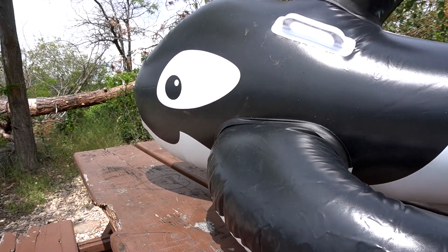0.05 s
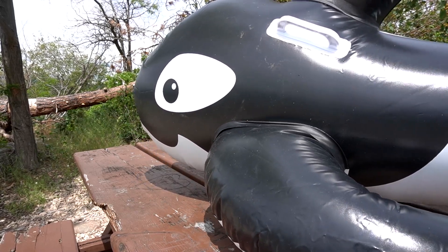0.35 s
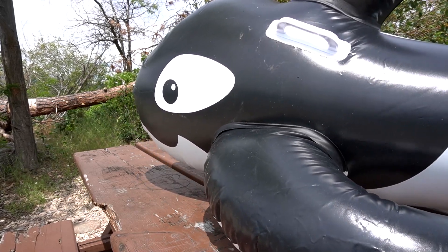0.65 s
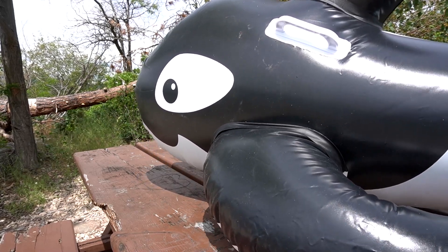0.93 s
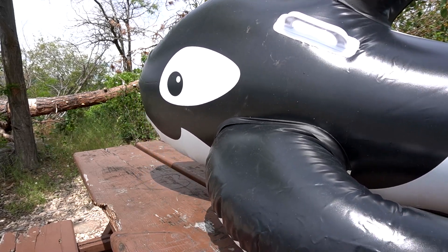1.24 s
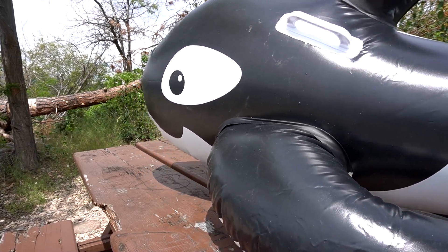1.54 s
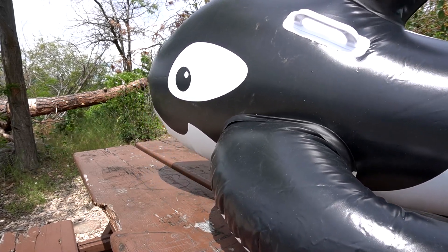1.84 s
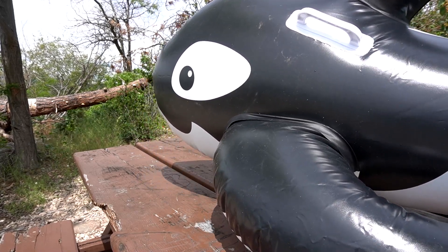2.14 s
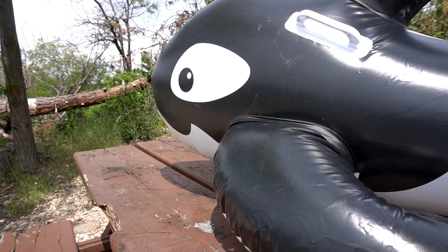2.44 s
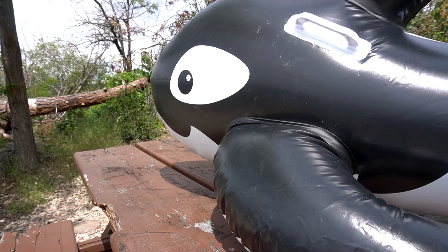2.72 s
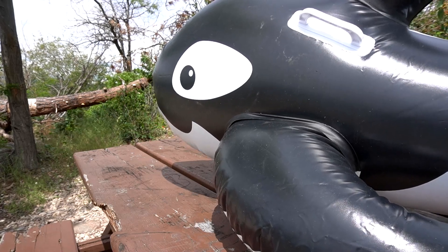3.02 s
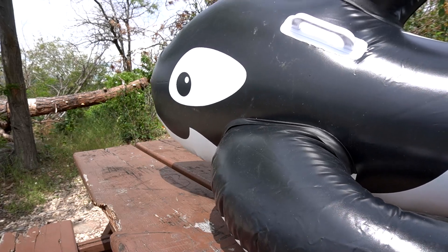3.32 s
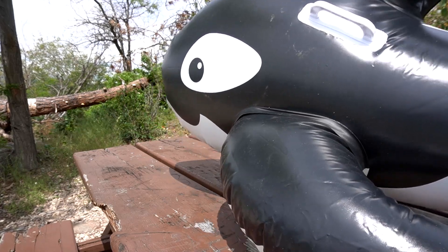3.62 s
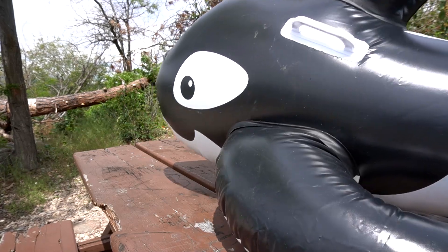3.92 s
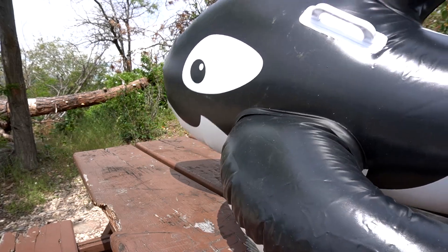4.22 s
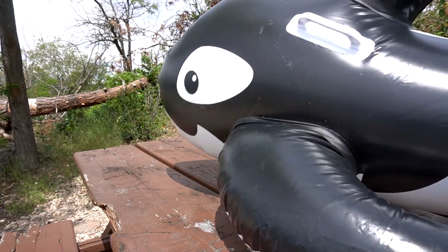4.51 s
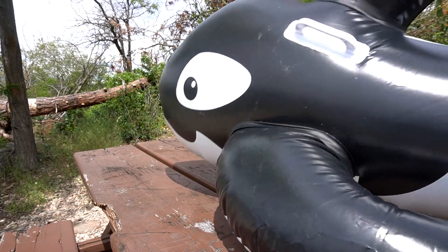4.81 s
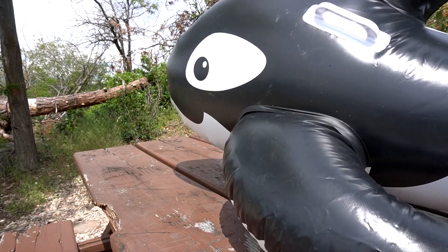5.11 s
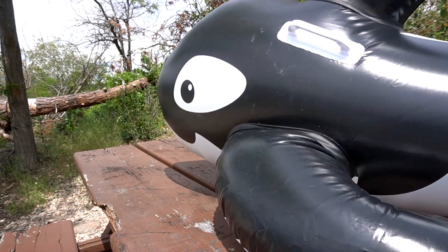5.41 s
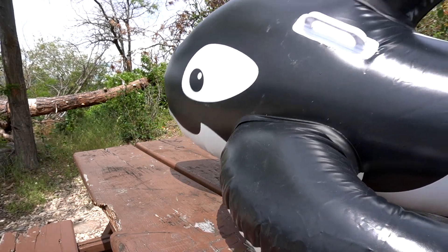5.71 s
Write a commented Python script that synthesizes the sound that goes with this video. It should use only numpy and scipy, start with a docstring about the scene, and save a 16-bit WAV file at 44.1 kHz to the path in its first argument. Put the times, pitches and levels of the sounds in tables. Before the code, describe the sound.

A faint low outdoor rumble and the drone of a distant engine run throughout. After a faint pop and a small click, a hand pump starts at about 0.8 seconds, close and slightly to the right, filling a large vinyl toy. It runs at two cycles a second: a soft low valve pop, a hollow hiss on the pull, then a brighter, louder jet of air on the push. The strongest strokes come between 1.5 and 2.2 seconds, with light clacks and tiny chirps. The stretching vinyl ticks faintly. At 3 seconds the seal gives a very short squeak, followed by a sharp clack at 3.2 seconds. At 3.7 seconds the pump rests and air seeps quietly through the hose for half a second. From about 4.3 seconds four more hissing cycles follow, continuing to the end at 6 seconds.

```python
"""A double-action hand pump fills a large vinyl toy outdoors, over the drone of a distant engine.
After a faint pop and a clack, pumping starts near 0.8 s, two cycles a second: a valve flap pops as the
piston turns, the pull draws a soft, hollow hiss, the push drives a bright jet through the nozzle, and
the stretching vinyl ticks. Now and then shaft and valve clack and the seal chirps, loudest around 3 s.
At 3.7 s the piston rests and air seeps through the hose for half a second; four more cycles follow."""
import sys
import numpy as np
from scipy import signal
from scipy.fft import rfft, irfft
from scipy.io import wavfile
from scipy.ndimage import uniform_filter1d

SR = 44100
rng = np.random.default_rng(int(sys.argv[2]) if len(sys.argv) > 2 else 0)


def output_pcm(signal):
    """Save a mono or channel-first signal as 16-bit PCM at the path in sys.argv[1].

    Samples are clipped to [-1, 1] before scaling.
    """
    pcm = np.clip(np.atleast_2d(signal).T, -1, 1) * 32767
    wavfile.write(sys.argv[1], SR, np.round(pcm).astype(np.int16))


N = 262395
TIME, FREQ_HZ = np.arange(N) / SR, np.fft.rfftfreq(N, 1 / SR)
HOP = 128
FRAME_S = np.arange(N // HOP + 5)[:, None] * HOP / SR
BIN_HZ = np.fft.rfftfreq(4 * HOP, 1 / SR)
GRID = (len(FRAME_S), len(BIN_HZ))
LOW_BAND = 1 / (1 + (BIN_HZ / 4200) ** 3)  # weight of the lower part of the hiss


def amp(db):
    """Amplitude ratio of a level in decibels."""
    return 10 ** (np.asarray(db) / 20)


def unit(x):
    """Normalisation to rms 1."""
    return x / np.sqrt(np.mean(x ** 2) + 1e-20)


def read(table, hz, axis=1):
    """Linear interpolation of one table column over log frequency."""
    table = np.array(table)
    return np.interp(np.log(hz + 1), np.log(table[:, 0]), table[:, axis])


def add(mix, s, sound):
    """Superposition of a sound on the mix at time s."""
    part = mix[max(round(s * SR), 0):][:len(sound)]
    part += sound[:len(part)]


def wander(rate_hz):
    """Low-pass random fluctuation of rms 1."""
    return unit(irfft(rfft(rng.standard_normal(N)) * np.exp(-(FREQ_HZ / rate_hz) ** 2), N))


def patches(frames, bins):
    """Random field of rms 1, correlated over time and frequency."""
    field = rng.standard_normal(GRID)
    for _ in range(2):
        field = uniform_filter1d(uniform_filter1d(field, frames, axis=0), bins, axis=1)
    return unit(field)


def noise(gain):
    """Spectral shaping of white noise by a frames x bins gain; unit gain gives rms 1."""
    white = rng.standard_normal(GRID) + 1j * rng.standard_normal(GRID)
    spectra = np.array([white.T, (white * gain).T])
    plain, shaped = signal.istft(spectra, nperseg=4 * HOP, noverlap=3 * HOP)[1][:, :N]
    return shaped / plain.std()


def scatter(x, t60):
    """Early reflections from table, toy and ground: one spectrally flat set for each side."""
    t = np.arange(SR // 20) / SR
    response = rfft(rng.standard_normal((2, len(t))) * amp(-60 * t / t60), axis=1)
    response /= np.sqrt(uniform_filter1d(abs(response) ** 2, size=25, axis=1))
    taps = irfft(response, len(t))[:, :len(t) // 2]
    return signal.oaconvolve(x[None], taps, axes=1)[:, :N]


# Sound field of the pump: f/Hz, left-minus-right level/dB, direct share of the power
PUMP_FIELD = [(150, -2, .99), (476, -2.5, 0.91), (1040, -6.5, 0.42), (2200, -7.5, 0.28),
              (4040, -11.5, 0.27), (6000, -6, 0.54), (7800, -3.5, 0.51), (9800, -2.5, 0.87),
              (13200, -5, 0.7), (15700, -8.5, 0.77)]
# Phase lag of the left side: f/Hz, phase/rad
LEFT_LAG = [(400, 0), (1100, .6), (2200, 2.5), (4000, 2.9), (6000, 3.1), (8000, 4), (10000, 5),
            (13000, 6.1), (15600, 6.7)]
def stereo_field(direct, diffuse):
    """Phase and level differences: direct sound reaches the right first; diffuse sound differs by side."""
    share = read(PUMP_FIELD, FREQ_HZ, axis=2)
    straight, around = np.sqrt(share) * rfft(direct), np.sqrt(1 - share) * rfft(diffuse)
    delayed = straight * np.exp(-1j * read(LEFT_LAG, FREQ_HZ))
    left = amp(read(PUMP_FIELD, FREQ_HZ)) * (delayed + around[0])
    return amp(3) * irfft(np.array([left, straight + around[1]]), N)


# Outdoor noise spectrum: f/Hz, relative density level/dB
AMBIENT_SPECTRUM = [(20, -14), (45, -1.5), (75, 4.5), (135, 2.5), (165, -8), (230, -8.5), (330, -18),
                    (520, -23), (650, -35.5), (1000, -39.5), (1600, -28.5), (4000, -23), (8000, -22),
                    (13000, -22.5), (15600, -18.5)]
# Likeness of left and right: f/Hz, correlation coefficient
STEREO_COHERENCE = [(300, .993), (700, .8), (1500, .3), (15000, .2)]
def open_air(level_db=-48):
    """Partial coherence: the low rumble sits in the centre; the thin hiss is wide."""
    left, independent = rfft(rng.standard_normal((2, N)))
    coherence = read(STEREO_COHERENCE, FREQ_HZ)
    right = coherence * left + np.sqrt(1 - coherence ** 2) * independent
    spectra = np.array([left, right]) * amp(read(AMBIENT_SPECTRUM, FREQ_HZ))
    return amp(level_db) * unit(irfft(spectra, N))


# Partials of the distant engine: f/Hz, rms level/dB
ENGINE_PARTIALS = [(75, -59), (119, -57.5), (239, -71.5)]
def engine():
    """Frequency modulation: all partials waver with the engine's speed, each varying in level."""
    speed = 1 + 0.01495 * wander(6.1)
    phase_per_hz = 2 * np.pi * np.cumsum(speed) / SR
    return sum(amp(db + 1.4 * wander(18)) * np.sqrt(2) * np.sin(hz * phase_per_hz)
               for hz, db in ENGINE_PARTIALS)


def crinkles(per_s=22, level_db=-44, skin_hz=2300, width_octaves=.9, decay_s=.0022, start_s=.8):
    """A Poisson process: the taut vinyl ticks at random as it stretches, once air is flowing."""
    ticks = rng.random(N) ** 2 * (rng.random(N) < per_s / SR) * (TIME > start_s)
    t = np.arange(SR // 100) / SR
    envelope = signal.oaconvolve(ticks, np.exp(-t / decay_s))[:N]
    skin = unit(np.exp(-(np.log2((BIN_HZ + 1) / skin_hz) / width_octaves) ** 2))
    return amp(level_db) * envelope * noise(skin)


# Short clacks, clicks and spits of the shaft and valve: t/s, level/dB, T60/s, tilt/(dB per octave)
PUMP_CLACKS = [(0.395, -25.5, .005, 5.5), (1.013, -31, 0.037, 1.5), (1.438, -24, 0.032, -7),
               (1.509, -28, 0.021, 4), (1.535, -34, .075, 11), (1.7505, -23, 0.02, 0),
               (1.941, -33, 0.052, -9), (2.036, -41.5, 0.046, -14), (2.993, -25, 0.15, 5),
               (3.2142, -10, 0.024, 7), (3.221, -23, 0.024, 2), (4.724, -23.5, .007, 1)]
# Spectrum of a clack: f/Hz, relative density level/dB
CLACK_SPECTRUM = [(200, -25), (900, -19), (1600, -4.5), (3800, 5), (6000, 3), (15600, -6)]
def clacks(attack_s=.0002):
    """Transient noise: shaft and valve clack, click and spit in exponentially damped broadband bursts."""
    t, out = np.arange(SR // 10) / SR, np.zeros(N)
    hz = np.fft.rfftfreq(len(t), 1 / SR)
    for s, db, t60, tilt in PUMP_CLACKS:
        colour = amp(read(CLACK_SPECTRUM, hz) + tilt * np.log2(1 + hz / 1000))
        burst = unit(irfft(rfft(rng.standard_normal(len(t))) * colour, len(t)))
        add(out, s, burst * amp(db - 60 * t / t60) * np.minimum(t / attack_s, 1))
    return out


# Slips of the piston seal: t/s, peak level/dB, f/Hz, duration/s
SEAL_SLIPS = [(1.502, -29, 3600, 0.0055), (1.749, -20.5, 3540, 0.0064), (2.9953, -10, 3780, 0.00297),
              (2.9985, -13, 3620, 0.0043)]
def chirps():
    """Stick-slip friction: the seal oscillates for a dozen or two cycles as it starts to slide."""
    out = np.zeros(N)
    for s, db, hz, length in SEAL_SLIPS:
        t = np.arange(0, length, 1 / SR)
        add(out, s, amp(db) * np.sin(np.pi * t / length) * np.sin(2 * np.pi * hz * t))
    return out


# Low pops and thuds of the valve flap and piston: t/s, level/dB
LOW_POPS = [(0.0255, -39.5), (0.8285, -24.5), (1.281, -29), (1.4498, -35), (1.7667, -30.5), (2.2752, -28),
            (2.7564, -30.5), (3.2256, -27.5), (3.748, -31.5), (4.7226, -29.5), (5.1903, -29.5),
            (5.649, -29.5)]
# Knocks of the piston on its end stop: t/s, level/dB
STOP_KNOCKS = [(1.4396, -36), (1.945, -40), (3.2127, -35)]
# Modes of the barrel: f/Hz, relative level/dB, T60/s
BARREL_MODES = [(475, -6, 0.034), (1650, -3.5, 0.011), (1960, -1, 0.01), (3050, 2, 0.0066)]
def pops(pop_hz=283, pop_hz_per_s=17, knock_hz=330, boom_hz=215, boom_t60=0.072, lead_s=.004):
    """Impulse excitation: flap or stop halts the air; one pressure swing rings air column and barrel."""
    t, swings, rings = np.arange(SR // 10) / SR, np.zeros(N), np.zeros(N)
    ring = sum(amp(db - 60 * t / t60) * np.sin(2 * np.pi * hz * t) for hz, db, t60 in BARREL_MODES)
    boom = amp(-15 - 60 * t / boom_t60) * np.sin(2 * np.pi * boom_hz * t)
    # the swing quickens as the toy fills
    low_pops = [(s, db, pop_hz + pop_hz_per_s * s, db - 10.5) for s, db in LOW_POPS]
    knocks = [(s, db - 2, knock_hz, db) for s, db in STOP_KNOCKS]
    for s, swing_db, hz, ring_db in low_pops + knocks:
        phase = 2 * np.pi * hz * (t - lead_s)
        add(swings, s - lead_s, amp(swing_db) * phase * np.exp((1 - phase ** 2) / 2))
        add(swings, s, amp(swing_db) * boom)
        add(rings, s, amp(ring_db) * ring)
    soft_rubber = signal.butter(4, 620, fs=SR, output="sos")
    thumps = signal.sosfilt(soft_rubber, swings) * amp([[-2], [0]])  # weaker on the left
    return thumps + stereo_field(rings, scatter(rings, t60=0.033))


# Seepage while the piston rests under load: onset t/s, duration/s, level/dB
HOSE_SEEPS = [(-.06, 0.095, -47), (0.693, 0.29, -45.5), (3.708, 0.54, -46.5)]
def seep(leak_db=-65.5, attack_s=0.019, sag_db_per_s=13, shut_db_per_s=450):
    """Power of pressure-driven leakage: over a constant leak, each seep opens, sags and shuts."""
    level = amp(leak_db)
    for s, length, db in HOSE_SEEPS:
        age = np.maximum(FRAME_S - s, 0)
        fade_db = sag_db_per_s * age + shut_db_per_s * np.maximum(age - length, 0)
        level = level + np.minimum(age / attack_s, 1) * amp(db - fade_db)
    colour = unit(amp(read(PULL_SPECTRUM, BIN_HZ) - 2 * np.log2(1 + BIN_HZ / 1000)))  # a duller pull
    unsteadiness = amp(2 * np.interp(FRAME_S, TIME, wander(27)))
    return (colour * level * unsteadiness) ** 2


def stroke(s, rise, fall, spectrum, body_db, dulling, thinning_db):
    """Jet noise follows the flow: slow air is duller, and the body thins as the chamber empties."""
    travel = (FRAME_S - s) / np.where(FRAME_S < s, rise, fall)  # 0 at peak flow, 1 about 20 dB down
    active = abs(travel[:, 0]) < 3
    travel = travel[active]
    colour_db = 20 * np.log10(unit(amp(read(spectrum, BIN_HZ))))
    flow_db = -20 * travel ** 2 * (1 - dulling * LOW_BAND)
    chamber_db = (body_db - thinning_db * np.tanh(travel)) * LOW_BAND
    return active, travel, colour_db + flow_db + chamber_db


def air_column(travel, hz, sweep_octaves, width_octaves, notch):
    """Resonance of a pipe whose length the piston changes: a gliding peak with a notch just below."""
    offset = (np.log2((BIN_HZ + 1) / hz) - sweep_octaves * travel) / width_octaves
    return np.exp(-offset ** 2) - notch * np.exp(-(offset + 2) ** 2)


def eddies(depth_db):
    """Turbulent modulation: eddies make the power of the lower hiss patchy."""
    return amp(depth_db * patches(frames=12, bins=4) * LOW_BAND) ** 2


# Pull strokes: peak flow t/s, level/dB, rise time/s, air column f/Hz
PULL_STROKES = [(0.92, -26.5, 0.13, 2580), (1.401, -20.5, .145, 3280), (1.894, -22, .165, 3050),
                (2.365, -25.5, 0.18, 3020), (2.855, -27, 0.09, 2640), (3.335, -26, 0.2, 2850),
                (4.339, -24, 0.1332, 2570), (4.829, -21.5, 0.13, 2330), (5.307, -24, 0.14, 2270),
                (5.774, -23, 0.14, 2600)]
# Jet spectrum on a pull: f/Hz, relative density level/dB
PULL_SPECTRUM = [(300, -26), (900, -33), (1300, -16.5), (2000, -9), (2600, -4.5), (4000, -4), (5300, -4.5),
                 (7000, -4), (8800, -1.1), (9600, -2), (10800, -1.4), (12500, -0.5), (15600, -1)]
# Intake whistles: f/Hz at peak flow, sag in slow air/octaves, width/octaves, gain/dB
INTAKE_WHISTLES = [(3850, 1, 0.14, 3), (10040, 0.64, 0.087, 2.5)]
def pulls(fall_s=.1, column_db=3.5):
    """Power of the suction noise: the column resonance sinks; whistles rise and fall with the flow."""
    power = np.zeros(GRID)
    for s, db, rise, column_hz in PULL_STROKES:
        body_db = -11 + 0.32 * s  # grows as the toy fills
        active, travel, jet_db = stroke(s, rise, fall_s, PULL_SPECTRUM, body_db,
                                        dulling=0.24, thinning_db=4.0)
        hollow = air_column(travel, column_hz, sweep_octaves=-0.14, width_octaves=0.13, notch=0.35)
        intake_db = 0
        for hz, sag, width, gain_db in INTAKE_WHISTLES:
            octaves_off = np.log2((BIN_HZ + 1) / hz) + sag * travel ** 2
            intake_db += gain_db * np.exp(-(octaves_off / width) ** 2)
        power[active] += amp(db + jet_db + column_db * hollow + intake_db) ** 2
    return power * eddies(depth_db=4.0)


# Push strokes: peak flow t/s, level/dB
PUSH_STROKES = [(1.143, -12.5), (1.631, -9.5), (2.122, -11.1), (2.599, -13), (3.098, -16), (3.591, -16.5),
                (4.589, -14.4), (5.064, -14), (5.528, -15), (5.985, -16.5)]
# Jet spectrum on a push: f/Hz, relative density level/dB
PUSH_SPECTRUM = [(300, -46), (900, -47.5), (1400, -31), (2400, -20), (3100, -16), (3500, -14), (4700, -9),
                 (6000, -8), (7800, -6), (8800, -5), (11500, -1), (13500, 1), (15600, -1)]
def pushes(usual_db=-14, usual_rise_s=0.098, usual_fall_s=0.12):
    """Power of the nozzle jet: swept volume is constant, so a harder push is shorter. It rings more."""
    power = np.zeros(GRID)
    for s, db in PUSH_STROKES:
        effort_db = db - usual_db
        stretch = np.exp(-0.0161 * effort_db)
        active, travel, jet_db = stroke(s, usual_rise_s * stretch, usual_fall_s * stretch, PUSH_SPECTRUM,
                                        body_db=-3.5 - 0.29 * effort_db, dulling=0.31, thinning_db=6.0)
        column_hz = 3270 + 116 * s  # climbs as the toy fills
        column_db = 2 + 0.6 * effort_db
        hollow = air_column(travel, column_hz, sweep_octaves=0.046, width_octaves=0.091, notch=.96)
        power[active] += amp(db + jet_db + column_db * hollow) ** 2
    return power * eddies(depth_db=1.6)


# Resonances of nozzle and hose: f/Hz, half-width/Hz, gain/dB
NOZZLE_MODES = [(3405, 20, 7.5), (3552, 20, 4), (4100, 250, 1.5), (4590, 40, 4), (5140, 40, 2),
                (6225, 30, 3), (6800, 35, 2), (7085, 20, 4), (7780, 100, 2.5), (8100, 90, 2)]
def hiss(flutter_db=0.68, echo_s=0.000514, echo_db=0.37, ripple_db=1.7, trim_db=-0.57):
    """Source and filter: the powers of push, pull and seep add, and nozzle and hose colour the sum."""
    modes_db = sum(db / (1 + ((FREQ_HZ - hz) / width) ** 2) for hz, width, db in NOZZLE_MODES)
    comb_db = echo_db * np.cos(2 * np.pi * BIN_HZ * echo_s)  # an echo inside the short nozzle
    hose_db = ripple_db * patches(frames=128, bins=1)  # close hose resonances drift as it flexes
    gain = np.sqrt(pushes() + pulls() + seep()) * amp(comb_db + hose_db)
    turbulence = np.array([noise(gain) for _ in range(3)])
    air = irfft(rfft(turbulence) * amp(trim_db + modes_db), N)
    return stereo_field(direct=air[0], diffuse=air[1:]) * amp(flutter_db * wander(46))


def scene():
    """Superposition of the pump, close by on the right, and the outdoor background."""
    plastic, squeaks = clacks() + crinkles(), chirps()
    pump = hiss() + pops()
    reflections = scatter(plastic + 0.5 * squeaks, t60=0.014)
    return pump + stereo_field(plastic + squeaks, reflections) + open_air() + engine()


def record(dry, ceiling=1.1, cutoff_hz=15800):
    """Soft saturation rounds the highest peaks; a low-pass filter then limits the band."""
    rounded = dry / (1 + (dry / ceiling) ** 12) ** (1 / 12)
    low_pass = signal.firwin(601, cutoff_hz, window=("kaiser", 8), fs=SR)
    return signal.oaconvolve(rounded, low_pass[None], "same")


dry = scene()
out = record(dry)
output_pcm(out)
```